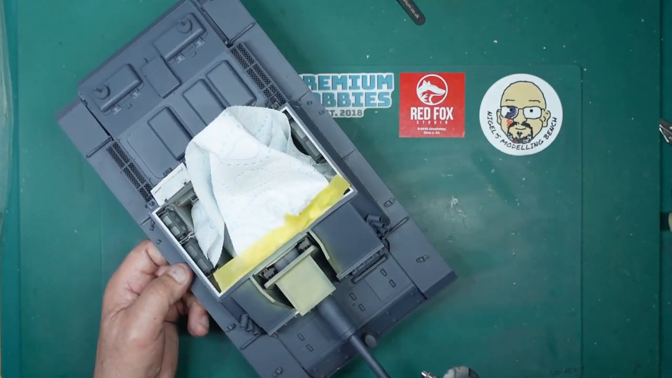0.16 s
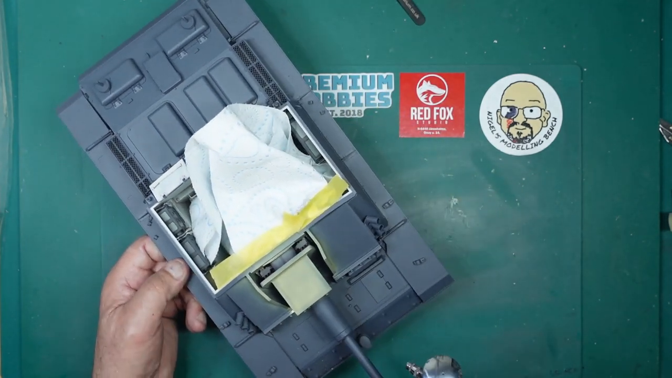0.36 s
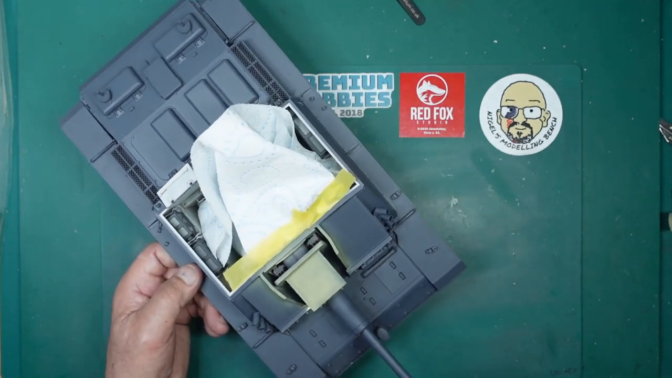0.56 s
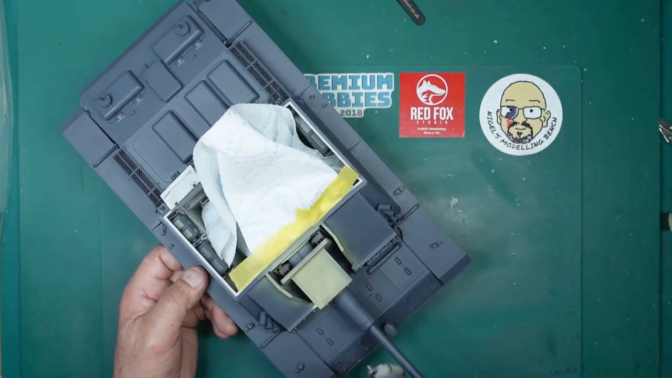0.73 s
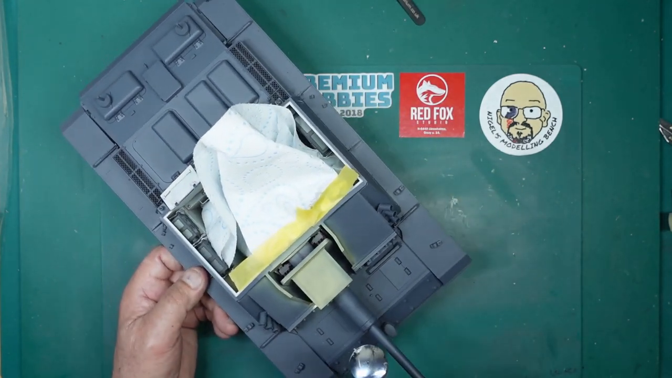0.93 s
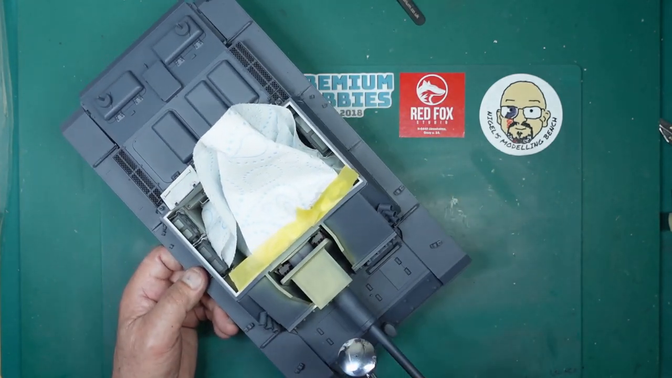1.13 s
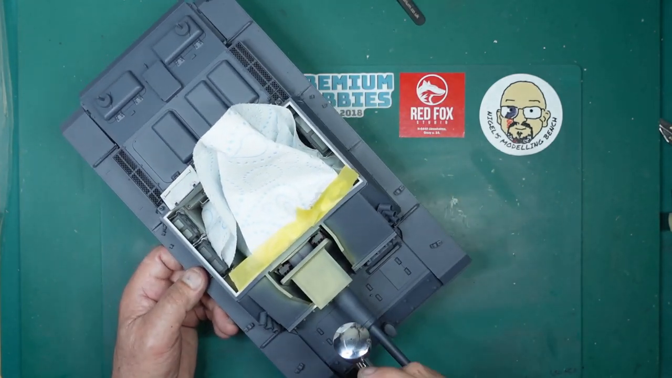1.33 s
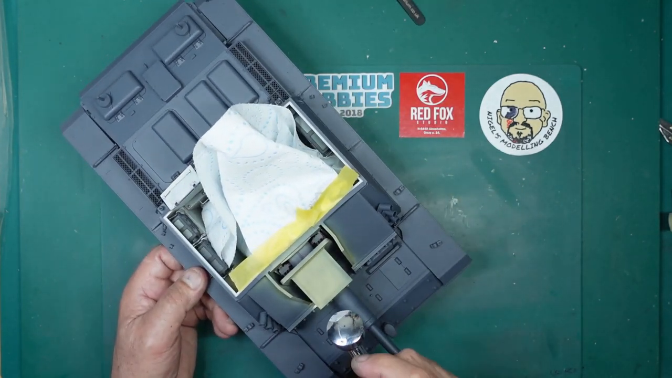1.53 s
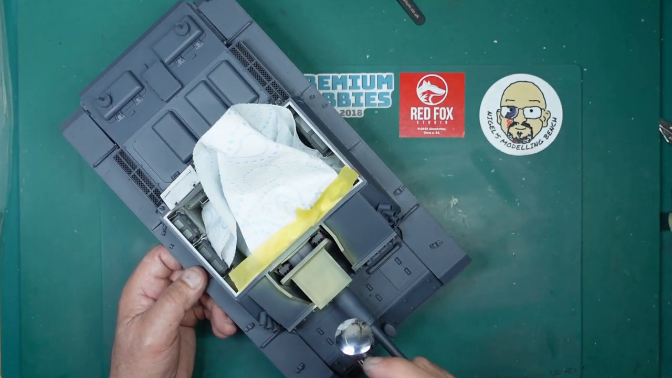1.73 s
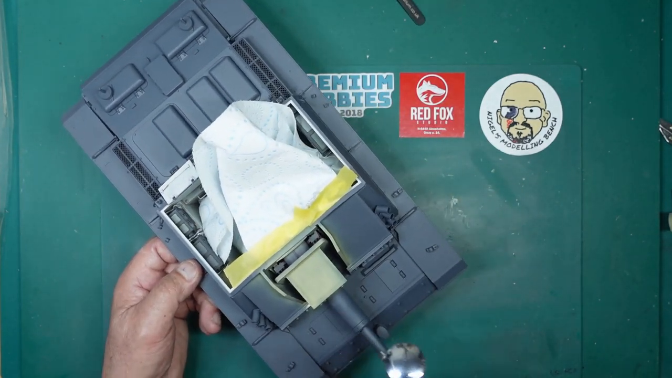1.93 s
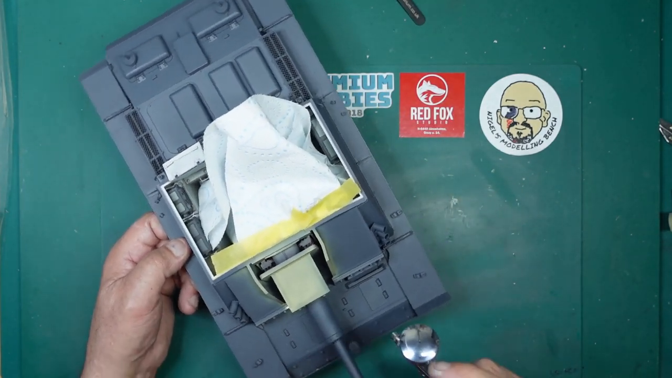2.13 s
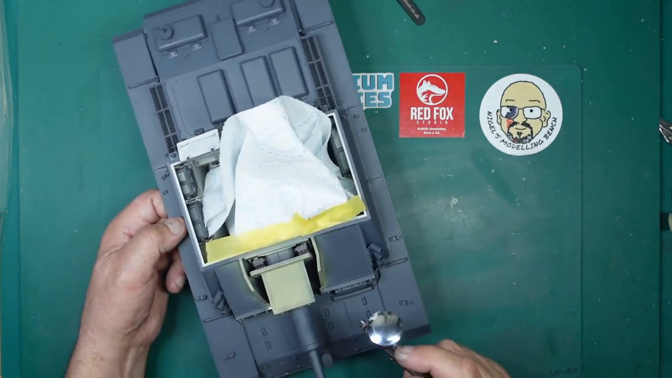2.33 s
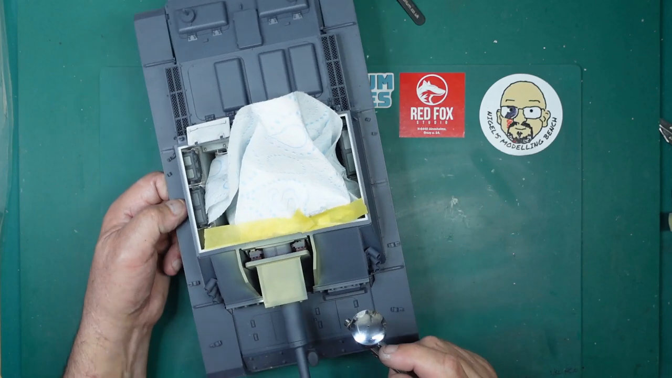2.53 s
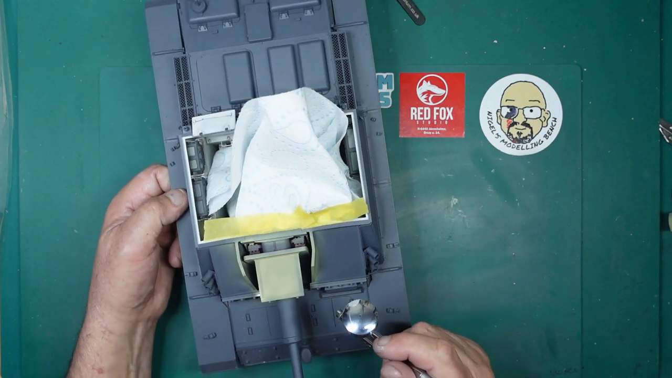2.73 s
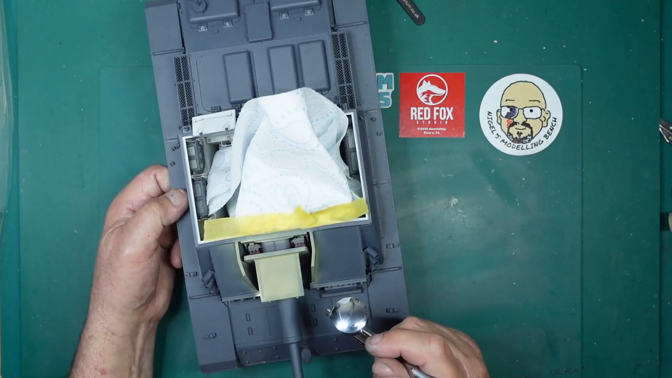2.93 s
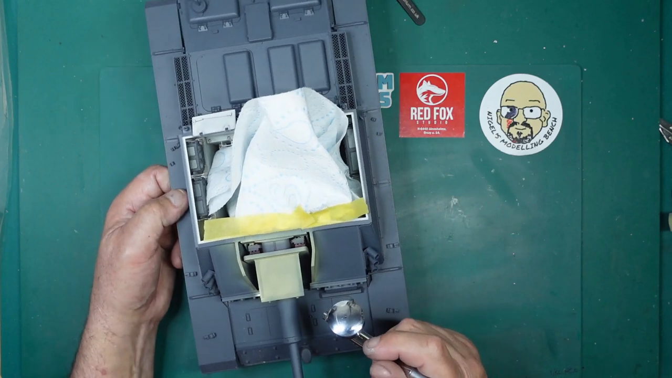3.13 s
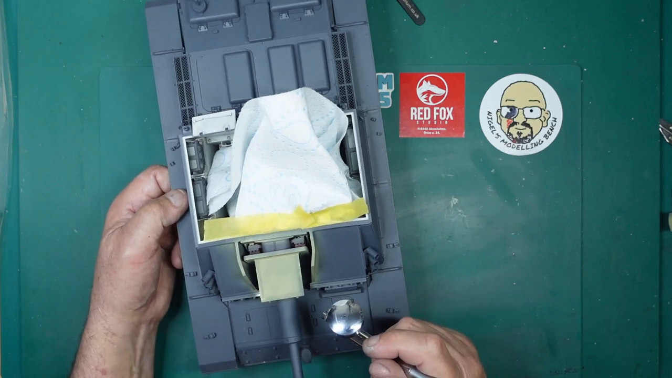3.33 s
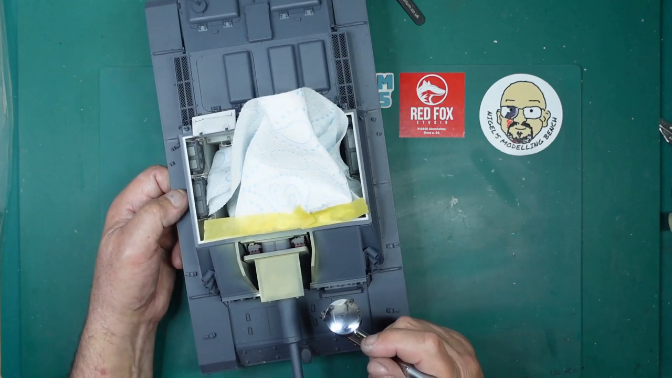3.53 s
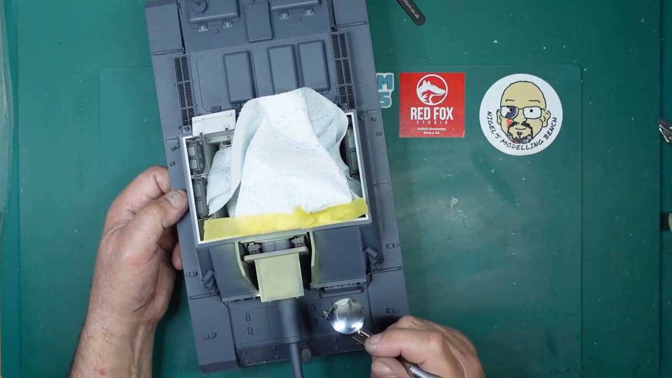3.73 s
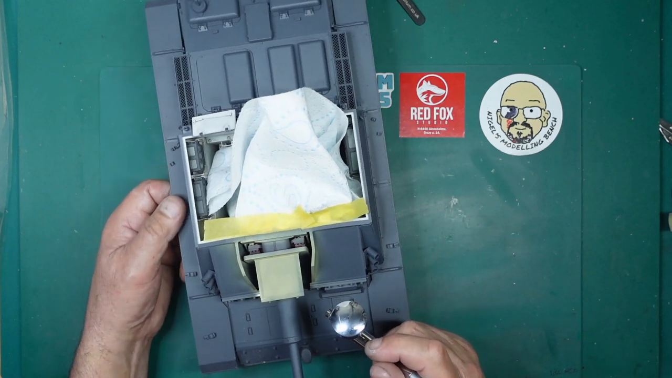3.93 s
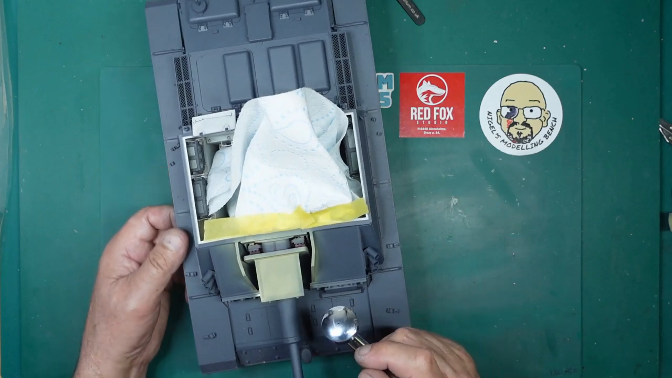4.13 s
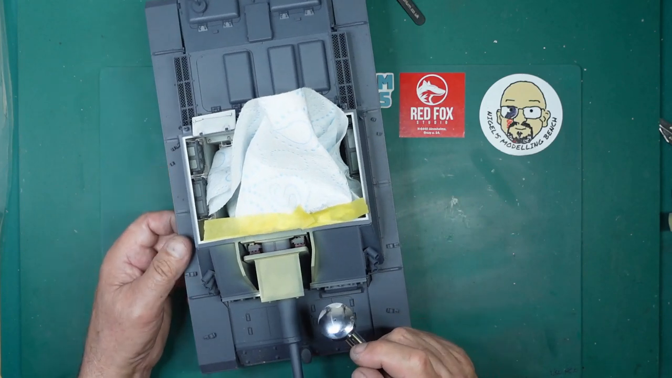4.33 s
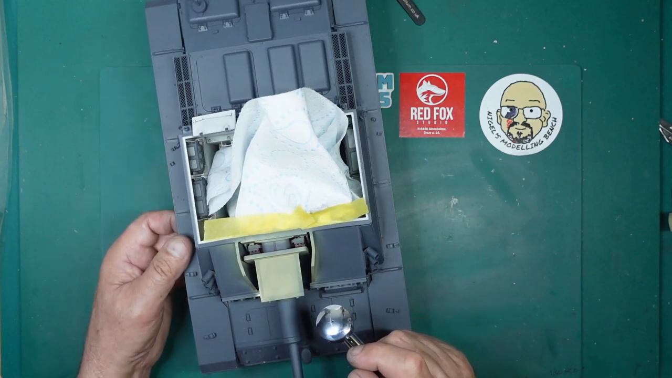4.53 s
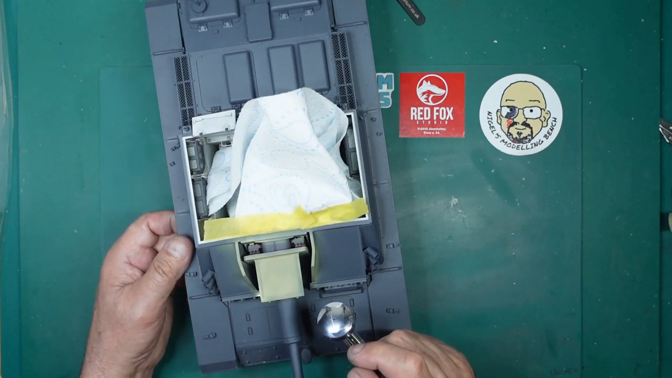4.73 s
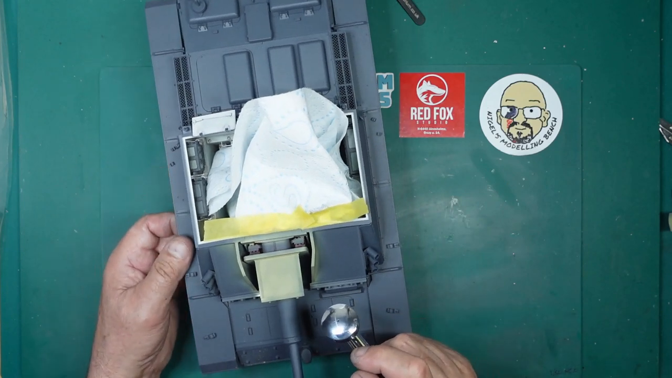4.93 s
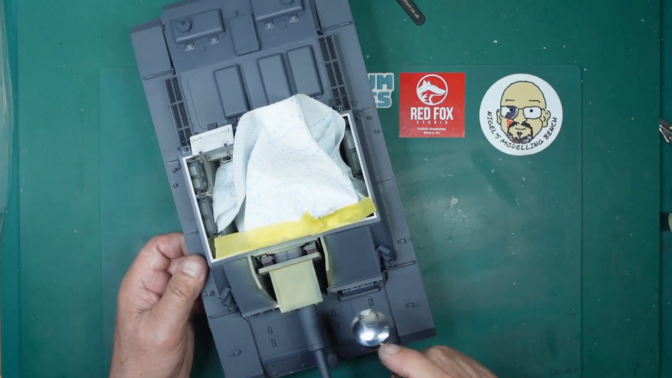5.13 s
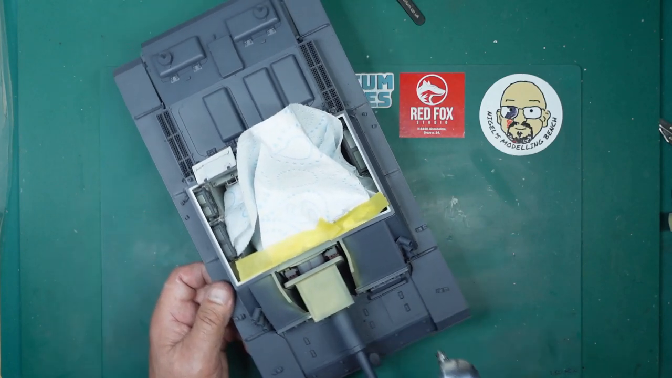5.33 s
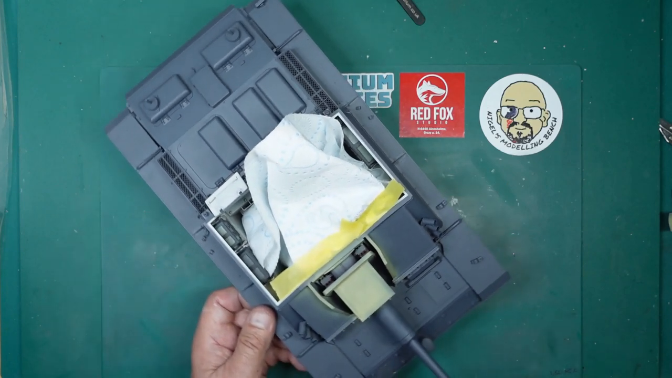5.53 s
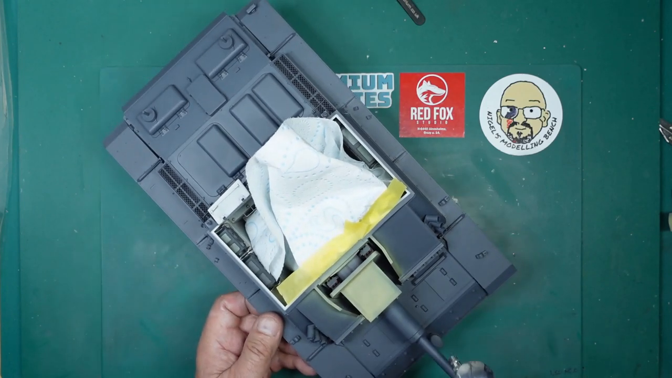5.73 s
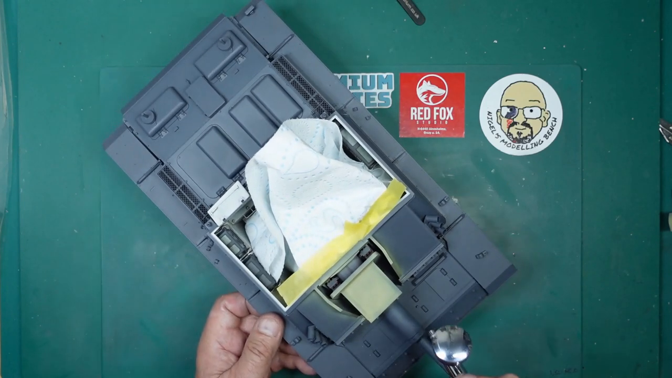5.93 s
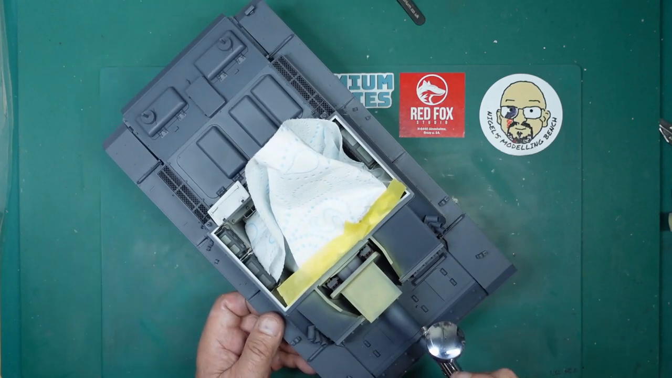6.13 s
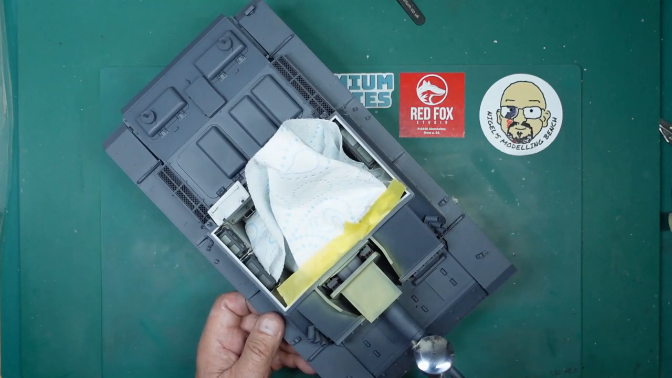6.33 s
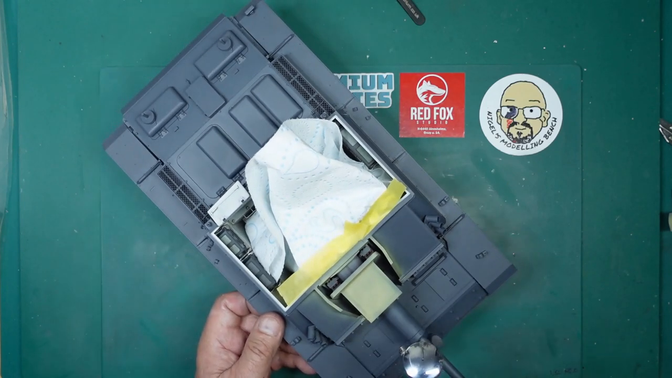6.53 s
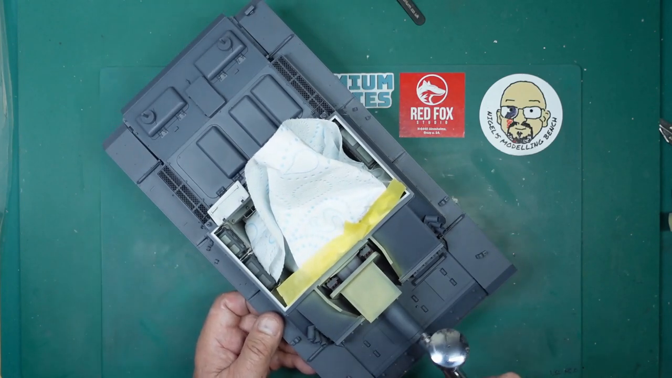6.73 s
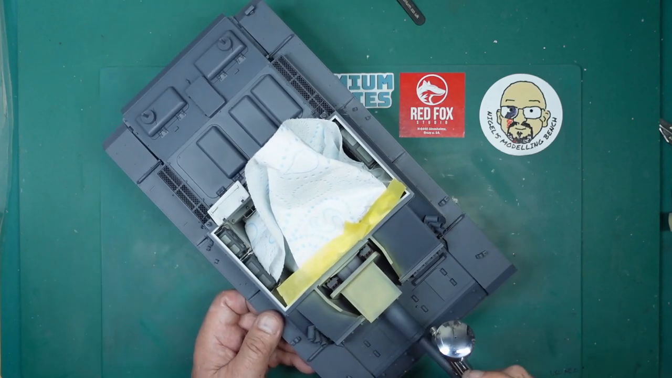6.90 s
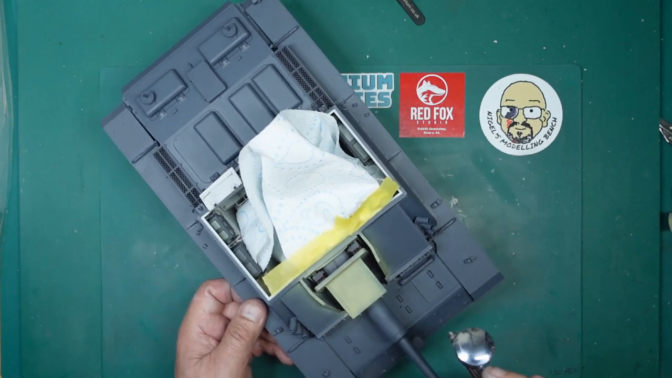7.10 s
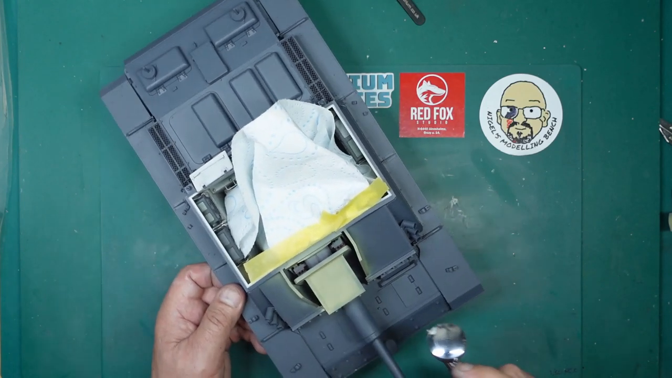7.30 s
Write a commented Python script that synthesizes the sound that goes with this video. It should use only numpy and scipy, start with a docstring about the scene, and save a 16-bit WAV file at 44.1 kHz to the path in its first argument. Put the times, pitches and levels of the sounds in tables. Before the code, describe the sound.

A quiet small workshop with faint room air and a thin steady whirr; everything is close and fairly dry. A barely audible rub comes first. At 0.9 s an airbrush opens with a bright, turbulent hiss on hollow plastic, growing until 1.75 s; a small piston compressor buzzes with a singing whine from 1.6 to 2.3 s. A trigger click and light knocks follow at 1.8 s, then the model slides with a squeak and knock around 2.3 s. A longer, fuller, roaring spray runs 2.65 to 5.1 s, fluttering slightly, with the compressor from 3.9 to 4.95 s. A ringing hiss near 4.8 s becomes a brief rasp, then a click at 5.1 s. Soft scraping and ticks come around 5.3-5.5 s. A third spray lasts 5.85 to 7.0 s, flaring near 6.7 s; the compressor restarts at 6.9 s, with a click and knock at 7.1 s.

```python
"""An airbrush sprays a plastic model tank in three bursts, close by in a small workshop.
Its jet is turbulent noise: nozzle hiss, plus splash and roar coloured by the hull's resonances.
The trigger clicks back after each burst, a decaying noise. A small piston compressor runs three times: shaft
harmonics, valve slaps and air puffs in a ringing head, a singing intake. Before and between bursts the model
slides on its mat as crowds of friction slips, with squeaks; its shell knocks. Quiet room air and a whirr stay."""
import sys
import numpy as np
from scipy import signal
from scipy.fft import rfft, irfft, next_fast_len
from scipy.io import wavfile
from scipy.ndimage import uniform_filter1d, map_coordinates

SR = 44100
rng = np.random.default_rng(int(sys.argv[2]) if len(sys.argv) > 2 else 0)


def generate_wav(sig):
    """Save sig (samples, or channels by samples) to the path in sys.argv[1] as 16-bit PCM at SR."""
    pcm = np.round(np.clip(np.atleast_2d(sig).T, -1, 1) * 32767).astype(np.int16)
    wavfile.write(sys.argv[1], SR, pcm)


N = 328986
TIME = np.arange(N) / SR  # s
FREQ = np.maximum(np.arange(N // 2 + 1) * SR / N, 1)  # Hz
SHAFT_HZ = 47.08  # compressor

# compressor runs: (motor on [s], motor off [s], relative level [dB])
COMPRESSOR_RUNS = [(1.63, 2.28, -1.5), (3.909, 4.95, -4.5), (6.9, 7.6, -2.5)]
# bursts: (valve opens [s], closes [s], hiss at full pull [dB], first air below that [dB],
# time constant of easing the trigger back [s], splash on the hull re hiss [dB], its drift [dB/s],
# hollow roar re hiss [dB], its drift [dB/s])
SPRAY_BURSTS = [(0.92, 1.75, -35.5, 7.5, 0.2, -3, 9, -10.5, 1),
                (2.656, 5.078, -32.5, 8.5, 0.57, 2, -1, 0.28, -3),
                (5.836, 7.026, -31.5, 11, 0.21, -6.5, -1.4, -11, -5.5)]


def undb(db):
    """Decibels to gain."""
    return 10 ** (np.asarray(db) / 20)


def unit(x):
    """Scale to rms 1."""
    return x / np.sqrt(np.mean(x ** 2))


def noise():
    """White noise."""
    return rng.standard_normal(N)


def curves(rows):
    """Columns of a table, joined by straight lines in time."""
    s, *columns = np.transpose(rows)
    return [np.interp(TIME, s, c) for c in columns]


def walk(rate_hz):
    """Smooth random wander, spread near 1."""
    hold = int(SR / rate_hz)
    steps = np.repeat(noise()[:N // hold + 1], hold)[:N]
    return 1.21 * uniform_filter1d(steps, hold)


def gate(on_s, off_s, rise_s, fall_s):
    """Opens and closes with two time constants."""
    opening = 1 - np.exp(-np.maximum(TIME - on_s, 0) / rise_s)
    return opening * np.exp(-np.maximum(TIME - off_s, 0) / fall_s)


def swell(s, half_s):
    """Smooth rise and fall around one moment, top 1."""
    return np.exp(-((TIME - s) / half_s) ** 2)


def blow(s, snap_s, tail_s, tail_db):
    """Envelope of a contact: a short crack and a fainter, longer rattle."""
    age = np.maximum(TIME - s, 0)
    decay = np.exp(-age / snap_s) + undb(tail_db) * np.exp(-age / tail_s)
    return (1 - np.exp(-age / 0.00034)) * decay


def tone(points):
    """Gain per frequency from (frequency [Hz], level [dB]) points."""
    hz, db = np.transpose(points)
    return undb(np.interp(np.log(FREQ), np.log(hz), db))


def resonances(modes, base_db):
    """Gain per frequency of steep resonances standing on a flat base."""
    peaks = sum(undb(db) ** 2 / (1 + (2 * (FREQ - hz) / width) ** 2) ** 2 for hz, width, db in modes)
    return np.sqrt(undb(base_db) ** 2 + peaks)


def above(hz, order=4):
    """High-pass gain."""
    return 1 / np.sqrt(1 + (hz / FREQ) ** (2 * order))


def below(hz, order=4):
    """Low-pass gain."""
    return 1 / np.sqrt(1 + (FREQ / hz) ** (2 * order))


def shape(x, gain):
    """Causal minimum-phase filter with the given gain per frequency."""
    # folding the cepstrum forward gives minimum phase
    cepstrum = irfft(np.log(np.maximum(gain, 1e-5)), N)
    cepstrum[1:N // 2] *= 2
    cepstrum[N // 2 + 1:] = 0
    response = irfft(np.exp(rfft(cepstrum)), N)[:SR // 4]
    return signal.fftconvolve(x, response)[:N]


def rush(gain):
    """Turbulent noise of the given colour, rms 1."""
    size = next_fast_len(N, True)
    colour = np.interp(np.arange(size // 2 + 1) * SR / size, FREQ, gain)
    return unit(irfft(rfft(rng.standard_normal(size)) * colour, size)[:N])


def workshop():
    """Quiet, diffuse room air with a narrow, steady whirr; mid and side."""
    # room air: (frequency [Hz], relative level [dB])
    air_tone = [(30, -34), (60, -29), (110, -3.5), (220, -0.5), (400, -5.5), (900, -7), (1400, -9),
                (3000, -16), (6000, -22.5), (16000, -28)]
    quiet_db = -70.5
    air, spread = (undb(quiet_db + .5 * walk(7.5)) * rush(tone(air_tone)) for _ in range(2))
    whirr = undb(-72.5) * rush(resonances([(1153, 120, 0.0043)], -56))
    return air + whirr, undb(-8.0) * spread


def handling():
    """Knocks on the resonant plastic shell; tracks catching and slipping on the mat."""
    # sliding model: (fastest [s], speeding up [s], slowing [s], relative rub level [dB],
    # fine scrape re rub [dB])
    slide_moves = [(0.02, 0.054, 0.072, -66.5, 1.5), (0.6, 0.07, 0.064, -71, 2),
                   (2.37, 0.13, 0.12, -45, -7), (5.25, 0.24, 0.16, -59.5, -0.5),
                   (5.49, 0.11, 0.083, -53, 2)]
    # resonances of the sliding tracks: (frequency [Hz], width [Hz], level [dB])
    track_modes = [(704, 150, -5), (1040, 560, -3.5), (1460, 470, -3), (2340, 560, -4), (2970, 1800, -7.5),
                   (3780, 140, -4.5), (4900, 300, -11.5), (6200, 2700, -16), (13000, 1800, -21)]
    # squeak of a dragging track: (time [s], pitch [Hz], level [dB])
    squeak_path = [(2.08, 1200, -51), (2.2, 1230, -57), (2.29, 1270, -40), (2.315, 1327, -38),
                   (2.333, 1378, -47), (2.37, 1165, -43), (2.48, 1234, -64), (2.55, 1230, -78)]
    # knocks and ticks: (time [s], relative level [dB], low-pass corner [Hz])
    knock_hits = [(1.864, -25.5, 6800), (1.882, -27, 2500), (2.34, -24, 3970), (2.364, -39, 4000),
                  (2.546, -46, 7000), (5.442, -36.5, 12000), (5.471, -41.5, 2500), (7.106, -20, 3600)]
    # resonances of the shell: (frequency [Hz], width [Hz], level [dB])
    shell_modes = [(567, 104, 4.5), (975, 250, 4), (1287, 104, 5.5), (2050, 1400, -3), (3560, 2800, -11),
                   (6000, 4700, -9.5), (11000, 6000, -15)]

    shell = resonances(shell_modes, -39) * above(530)
    knocks = 0
    for s, db, hz in knock_hits:
        envelope = undb(db - 11.0) * blow(s, 0.0089, 0.08, -15.5)
        knocks = knocks + envelope * rush(shell * below(hz, order=2))

    # friction is a crowd of tiny slips of very unequal size
    slips = noise() * undb(4.5 * noise()) * undb(1.1 * walk(110))
    tracks = resonances(track_modes, -31.0) * above(170)
    rub = unit(shape(slips, tracks * below(1220)))
    scrape = unit(shape(slips[::-1], tracks * above(1670)))  # reversed to decorrelate
    slide = 0
    for s, rise_s, fall_s, rub_db, scrape_db in slide_moves:
        speed = np.exp(-np.maximum((s - TIME) / rise_s, (TIME - s) / fall_s))
        slide = slide + speed * undb(rub_db) * (rub + undb(scrape_db) * scrape)

    hz, squeak_db = curves(squeak_path)
    squeak = walk(130) * np.sin(2 * np.pi * np.cumsum(hz) / SR + walk(90))
    squeak = undb(squeak_db) * squeak * gate(squeak_path[0][0], squeak_path[-1][0], .01, .02)
    return knocks + undb(-2.5) * slide + squeak


def jet(hull, splash_db, roar_db):
    """Nozzle hiss, splash of air on the plastic and roar of the hollows beneath it."""
    colour = resonances(hull, 0) * above(424)
    hiss = rush(colour * above(6000, order=6) * below(15610, order=40))
    splash = rush(colour * above(1355, order=6) * below(5980, order=6))
    roar = rush(colour * below(1374, order=6))
    return hiss + splash * undb(splash_db) + roar * undb(roar_db)


def bounce(x, drift_ms, wander_hz):
    """Short echoes whose paths change as the hand moves, so the hiss slowly phases."""
    # nearby surfaces: (mean path delay [ms], level [dB])
    echo_paths = [(1.1, -17), (2.298, -20), (3.9, -17)]
    out = x
    for ms, db in echo_paths:
        lag = (ms + drift_ms * walk(wander_hz)) * SR / 1000  # samples
        out = out + undb(db) * map_coordinates(x, [np.arange(N) - lag], order=3)
    return out


def airbrush():
    """Bursts that grow as the trigger is eased back; the jet flutters and changes over edges."""
    # hull resonances where the jet lands: (frequency [Hz], width [Hz], level over the plain rush [dB])
    front_plate = [(517, 76, 10), (870, 570, 3), (1993, 150, 21.5), (2190, 1500, 14.5), (2930, 470, 17.5),
                   (3920, 320, 15.5), (4580, 590, 9.5), (5010, 150, 12.5), (5960, 1100, 3.5),
                   (8300, 830, 4), (10370, 1000, 6), (12250, 1100, 8.1), (15600, 2900, 7.5)]
    turret_gap = [(300, 600, 5.4), (519, 125, 17.5), (873, 200, 18.8), (1008, 315, 19.7), (1476, 270, 15.4),
                  (1970, 272, 18.65), (2460, 700, 12.7), (2824, 56, 17.5), (3080, 280, 13),
                  (4053, 360, 10.6), (4486, 164, 10.5), (4920, 92, 9.4), (4960, 73, 12), (5940, 980, 6.6),
                  (7850, 1240, 0.2), (10201, 1700, 0.44), (12340, 1000, 7.6), (14200, 630, 11),
                  (15660, 1400, 11.1)]
    front_edge = [(275, 230, 15), (504, 170, 18.7), (850, 540, 12), (1680, 88, 9.4), (1940, 800, 3.1),
                  (2725, 290, 12.6), (4600, 1600, 1), (6750, 720, 6), (9150, 1188, 6), (10870, 870, 12),
                  (13100, 2400, 11.5), (15353, 1500, 10)]
    barrel_side = [(477, 43, 8.3), (950, 390, 1.9), (1420, 126, 13.3), (1884, 56, 18.4), (2290, 690, 11.5),
                   (3050, 71, 10.4), (3810, 200, 2.3), (5800, 3100, 2.5), (8800, 1400, 8.1),
                   (10718, 170, 5.7), (13035, 3300, 6.4), (15278, 1181, 16.8)]
    # last burst swings over and back: (time [s], share of power aimed beside the barrel [0-1])
    swing_path = [(6.38, 0.52), (6.58, 0.71), (6.76, 1), (6.92, 0.02)]
    # edges and openings crossed: (time [s], half length [s], flare [dB], change of roar [dB])
    edge_passes = [(1.625, 0.045, 2, 0.5), (1.723, 0.061, -2, 1), (3.12, 0.055, -4, 0),
                   (3.23, 0.024, 0.5, -0.5), (3.41, 0.03, 1, -2), (4, 0.061, 1.5, 2.5),
                   (5.067, 0.062, -5.5, -7.5), (6.006, 0.048, -0.5, 6), (6.148, 0.028, 5, 0.5),
                   (6.68, 0.14, 7, -1.5), (6.91, 0.061, -1, 7.5)]
    edge_hiss_share = 0.18  # part of a flare in the hiss; the splash takes the rest
    landing_drop_db, landing_s = 9, 0.028  # splash and roar start weaker, until the jet finds the plastic

    flutter_db = 0.59 * walk(28)
    feed_db = 0.38 * walk(45) + .5 * walk(600)  # uneven paint feed
    tremor_db = 1.0 * walk(14)  # the hand wavers over the hollows
    flare_db = sum(db * swell(s, half_s) for s, half_s, db, _ in edge_passes)
    hollow_db = sum(db * swell(s, half_s) for s, half_s, _, db in edge_passes)
    swing = np.clip(curves(swing_path)[0], 0, 1)
    aims = [[(front_plate, 1)], [(turret_gap, 1)], [(front_edge, 1 - swing), (barrel_side, swing)]]
    out = 0
    for burst, aim in zip(SPRAY_BURSTS, aims):
        on, off, full_db, pull_db, pull_s, splash, splash_drift, roar, roar_drift = burst
        age = np.clip(TIME - on, 0, off - on)
        landing_db = -landing_drop_db * np.exp(-age / landing_s)
        hiss_db = full_db - pull_db * np.exp(-age / pull_s) + edge_hiss_share * flare_db
        splash_db = splash + splash_drift * age + landing_db + (1 - edge_hiss_share) * flare_db
        roar_db = roar + roar_drift * age + landing_db + hollow_db + tremor_db
        air = sum(np.sqrt(share) * jet(hull, splash_db + flutter_db, roar_db) for hull, share in aim)
        out = out + air * undb(hiss_db + feed_db) * gate(on, off, 0.0077, 0.0035)
    return bounce(out, 0.039, 2.5) * undb(-0.08)


def compressor():
    """The piston hums; reed valves slap twice a turn and puff air through the ringing head."""
    # hum: (multiple of the shaft rate, relative level [dB])
    hum_partials = [(1, -67.5), (2, -72), (5, -62.5), (6, -74), (6.5, -56.5), (7.5, -59), (9, -73),
                    (10, -69), (23, -54)]
    # cylinder head resonances: (frequency [Hz], width [Hz], level [dB])
    head_modes = [(968, 90, -0.5), (1110, 79, -3), (1360, 79, -10.5), (1774, 310, -16), (2245, 93, -12.5),
                  (3626, 400, -14.5), (5080, 790, -24), (7030, 1700, -31.5), (8270, 560, -27.5),
                  (10100, 640, -33.5), (13400, 700, -29)]

    turns = SHAFT_HZ * TIME + 0.013 * walk(14)
    running, throb = 0, 0
    for on, off, db in COMPRESSOR_RUNS:
        power = undb(db) * gate(on + 0.027, off, 0.055, 0.056)
        running = running + power
        # the machine rocks on its feet, so the third harmonic throbs
        throb = throb + power * (1 + .7 * np.cos(2 * np.pi * 5.9 * (TIME - on - .115)))
    hum = sum(undb(db) * unit(np.sin(2 * np.pi * (k * turns + rng.random()))) for k, db in hum_partials)
    third = undb(-55.5) * throb * np.sin(6 * np.pi * turns)

    slaps = np.diff(np.floor(turns), prepend=0) + .5 * np.diff(np.floor(turns + 0.31), prepend=0)
    puffs = noise() * (np.exp(-(turns % 1) / 1.2) + 1.1)
    ring = resonances(head_modes, -37.5) * above(260)
    slap_ring = shape(unit(slaps), ring * below(1800, order=1))
    puff_ring = shape(unit(puffs), ring * above(1400, order=1))
    head = unit(slap_ring + 1.5 * puff_ring)
    rumble = rush(tone([(30, -14), (90, 5.5), (400, 3.5), (750, 1.5), (1500, -38), (8000, -41)]))

    # the motor shudders as it starts and stops; a relief valve sighs when it stops
    shudder, sigh = 0, 0
    for on, off, _ in COMPRESSOR_RUNS:
        shudder = shudder + gate(on, on + 0.11, 0.025, .03) + .6 * gate(off, off + 0.074, .03, .02)
        sigh = sigh + gate(off - .012, off + 0.011, 0.0032, 0.03)
    shudder = undb(-57.0) * shudder * np.sin(2 * np.pi * 91 * TIME)
    sigh = undb(-43) * sigh * rush(above(3000, order=1) * below(13400))
    return running * (hum + undb(-45.5) * head + undb(-55) * rumble) + third + shudder + sigh


def whistle():
    """The compressor's intake sings on shaft harmonic 20, loudest soon after the start, pulsing each turn."""
    strength = 0
    for on, off, db in COMPRESSOR_RUNS:
        fading = gate(on + 0.04, min(on + 0.23, off), 0.024, 0.36)
        strength = strength + undb(db) * fading * gate(on, off, .01, .03)
    shaft = 2 * np.pi * SHAFT_HZ * TIME  # rad
    pulse = 1 + 0.17 * np.cos(shaft)
    return undb(-39.5 + 1.3 * walk(90)) * strength * pulse * np.sin(20 * shaft + .5 * walk(45))


def trigger():
    """The spring throws the trigger against its stop: short bursts of coloured noise."""
    # trigger springs back: (time [s], relative level [dB])
    click_hits = [(1.7925, -31.5), (5.14, -27), (7.0964, -28)]
    # click colour: (frequency [Hz], level [dB])
    click_tone = [(470, -57), (800, 0), (1120, -11), (1540, -20), (2570, -11), (5870, 4.5), (9570, -1),
                  (10600, 6.5), (11600, -3.5), (15000, 2), (16000, -34)]
    clicks = sum(undb(db - 1.0) * blow(s, 0.0018, 0.015, -10) for s, db in click_hits)
    return rush(tone(click_tone)) * clicks


def slot():
    """Air rings hissing across a narrow gap, then rasps off the rim until the valve shuts."""
    # jet catches a slot in the hull: (time [s], half length [s], level [dB])
    slot_pass = (4.83, 0.16, -34.5)
    # it grazes the rim as the brush is drawn away: (time [s], half length [s], level [dB])
    rim_pass = (5.074, 0.023, -29)
    on, off = SPRAY_BURSTS[1][:2]
    ring = rush(resonances([(2860, 330, 0)], -26))
    rasp = rush(above(2350, order=2) * below(5000, order=2))
    air = 0
    for (s, half_s, db), sound in [(slot_pass, ring), (rim_pass, rasp)]:
        air = air + undb(db) * swell(s, half_s) * sound
    return air * gate(on, off, 0.018, .004)


def reflections(x, t60_s):
    """Dense bounces off the bench and walls: decaying noise response of unit energy."""
    t = TIME[:SR // 2]
    response = noise()[:len(t)] * np.exp(-np.log(1000) * t / t60_s) * (t > .002)
    return signal.fftconvolve(x, response / np.linalg.norm(response))[:N]


def scene():
    """All sources sit near the centre; the jet is closest, so the others carry more of the room."""
    # room sound of the close, narrower jet: (frequency [Hz], side gain [dB])
    jet_width = [(100, -20), (300, -11.5), (700, -15), (1400, -8.5), (2800, -10), (5000, -4), (9000, 1.5),
                 (14000, -4)]
    # room sound of the rest: (frequency [Hz], side gain [dB])
    far_width = [(100, -10), (800, -9.5), (1400, -7), (2400, -5.5), (4500, -2.5), (8000, 0), (14000, -3)]
    near = airbrush() + slot()
    far = trigger() + compressor() + whistle() + handling()
    air, spread = workshop()
    mid = .95 * (near + far) + undb(-11) * reflections(near + far, .24) + air
    near_room = undb(-10) * reflections(near, .16)
    far_room = undb(-5.5) * reflections(far, .12)
    side = shape(near_room, tone(jet_width)) + shape(far_room, tone(far_width)) + spread
    return np.array([mid + side, mid - side])


def record(dry):
    """The recorder cuts the top steeply: elliptic low-pass."""
    top_hz = 15850
    return signal.sosfilt(signal.ellip(12, .2, 80, top_hz, fs=SR, output="sos"), dry)


dry = scene()
out = record(dry)
generate_wav(out)
```